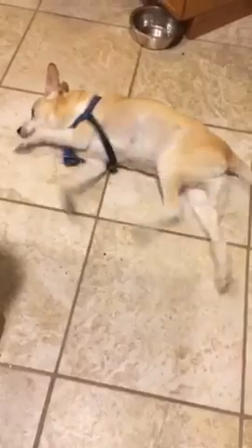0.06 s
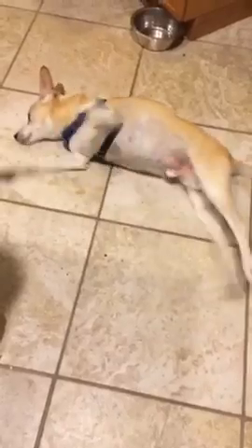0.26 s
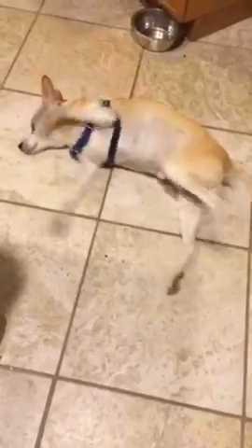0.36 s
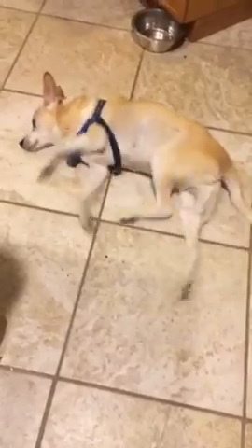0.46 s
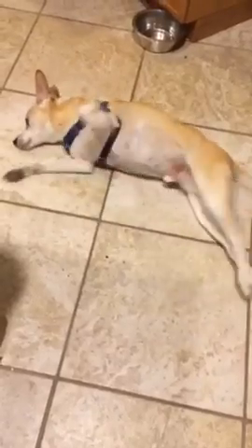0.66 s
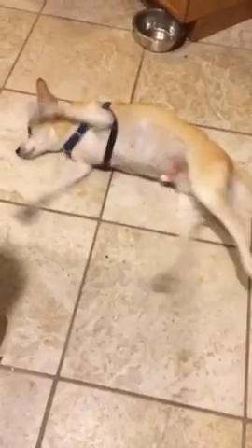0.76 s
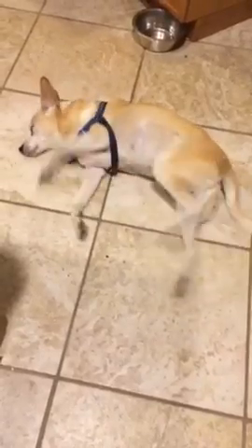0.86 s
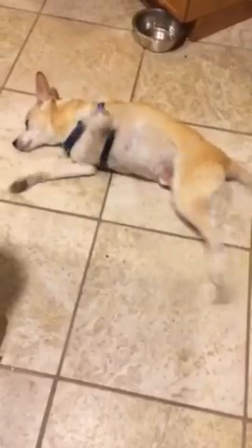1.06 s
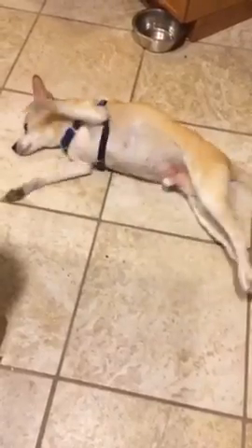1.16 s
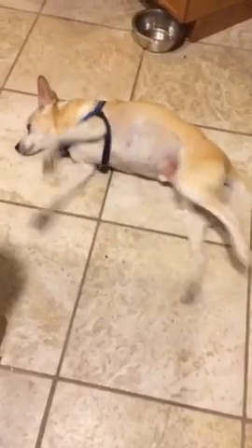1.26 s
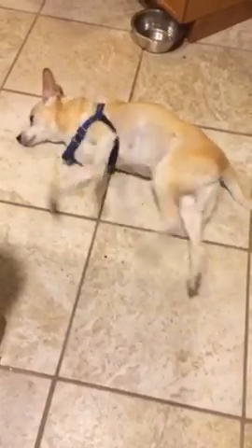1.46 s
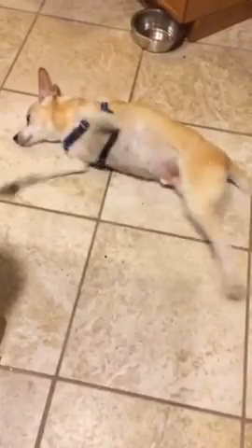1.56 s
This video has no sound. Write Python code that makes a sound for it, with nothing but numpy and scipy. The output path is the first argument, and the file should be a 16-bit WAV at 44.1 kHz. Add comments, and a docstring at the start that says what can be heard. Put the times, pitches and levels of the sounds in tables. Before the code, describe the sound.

A small dog's claws click and skid irregularly on floor tile, broken by a hard double knock

```python
"""A small dog lies on its side on a tiled kitchen floor and paddles its legs.
Claws tick (click plus noise crunch) and slide (dense random slips); the coat rubs (softer slips).
Paws and body thud (short low sines); the flank shifts with a low rumble (filtered slips).
A double knock is much harder, with a thin metallic ring (decaying sines); a faint one follows.
The hard room (decaying noise bands) answers all but the rumble, over quiet background noise."""
import sys
import numpy as np
from scipy import signal
from scipy.fft import rfft, irfft
from scipy.io import wavfile

SR = 44100
rng = np.random.default_rng(int(sys.argv[2]) if len(sys.argv) > 2 else 0)


def inscribe(sig):
    """Save sig as 16-bit PCM at rate SR to the path in sys.argv[1].

    A 1-D sig is mono; a 2-D sig holds one channel per row.
    Samples are clipped to [-1, 1] before scaling.
    """
    pcm = np.round(np.clip(np.atleast_2d(sig).T, -1, 1) * 32767)
    wavfile.write(sys.argv[1], SR, pcm.astype(np.int16))


N = 70560
T = np.arange(N) / SR  # [s]
HZ = np.maximum(np.arange(N + 1) * SR / (2 * N), 1)  # bins of a 2N-point spectrum

# background noise of the house, spectrum: (frequency [Hz], relative density [dB])
AIR_SPECTRUM = [(20, 8.5), (70, 18), (180, 17.5), (255, 13), (320, 11.5), (600, 7.5), (1300, -1),
                (3000, -2.5), (7000, -2.5), (11000, -6.5), (15000, -11)]
AIR_DB = -62

# weight shifts of the body: (time [s], length [s], level [dB])
SHIFTS = [(-.02, 0.04, -60.5), (.44, 0.18, -62), (0.93, 0.14, -57), (1.43, 0.044, -57.5)]
# rumble spectrum: (frequency [Hz], relative level [dB])
SHIFT_SPECTRUM = [(40, -14), (130, -22), (205, 12), (250, -11.5), (310, 4.5), (400, -0.5), (600, -16.5),
                  (2000, -54)]
SHIFT_ATTACK_S, SHIFT_RELEASE_S = 0.04, 0.064

# claws sliding over the tile: (time [s], length [s], level [dB], tilt [dB/octave])
SLIDES = [(-.01, 0.026, -55.5, 0.5), (0.105, 0.022, -46, -1.5), (0.172, 0.034, -46.5, -1.5),
          (0.541, 0.044, -47, -0.5), (0.597, 0.028, -55, -2), (0.621, 0.023, -46.5, 1),
          (0.796, 0.068, -63.5, -2), (0.839, 0.04, -64, -2.5), (.905, 0.017, -63.5, -2.5),
          (1.014, 0.021, -48.5, -1.5), (1.078, 0.053, -53, 1.5), (1.284, 0.036, -71.5, 0),
          (1.444, 0.012, -62, -4), (1.461, .033, -48.5, -0.5), (1.549, 0.035, -51.5, 0)]
# slide spectrum before tilt: (frequency [Hz], relative level [dB])
SLIDE_SPECTRUM = [(300, -10), (900, -1.5), (2000, -5), (4300, 0.5), (7500, 4), (9500, 1), (12200, 5),
                  (14000, -2), (15300, -6)]
SLIDE_ATTACK_S, SLIDE_RELEASE_S = 0.0045, 0.0074
GRAINS_PER_S, GRAIN_SPREAD_DB = 11000, 2
GRIP_STEPS_PER_S, GRIP_DB = 120, 3

# coat and pads rubbing over the floor: (time [s], length [s], level [dB])
RUBS = [(-.01, 0.054, -60), (0.07, 0.039, -52.5), (0.355, 0.08, -60.5), (0.44, 0.042, -55),
        (0.494, 0.1, -58.5), (0.642, 0.032, -58), (0.953, 0.11, -66), (1.075, 0.067, -61),
        (1.19, 0.058, -71), (1.449, 0.08, -62.5)]
# rub spectrum: (frequency [Hz], relative level [dB])
RUB_SPECTRUM = [(100, -1.5), (300, 6.5), (600, -3), (1500, 0.5), (3000, 3.5), (5000, -3), (9000, -7),
                (15000, -13)]
RUB_ATTACK_S, RUB_RELEASE_S = 0.02, 0.0082

# claw ticks: (time [s], energy [dB], crunch decay [s], tilt [dB/octave])
TICKS = [(0.0202, -24, 0.0041, -1.5), (0.0225, -26.5, 0.0038, -6), (0.053, -20.5, 0.0041, -5.5),
         (0.1126, -16, 0.0012, 11), (0.163, -10.5, 0.0057, -1), (0.1789, -6.5, 0.0018, -1),
         (0.1863, -22, 0.0016, -4), (0.4406, -26, 0.0043, -2.5), (.4830, -27.5, 0.0014, -5),
         (.5378, -17, 0.00053, 14), (.5502, -16.5, 0.0025, 6.5), (0.564, -36, 0.0039, 5),
         (0.6026, -20, 0.0048, -4), (0.6755, -25, 0.0022, 8.5), (.7260, -33.5, 0.0018, -8),
         (0.865, -33, 0.0024, -5), (1.018, -19, 0.0017, 5.5), (1.0450, -24, .003, -0.5),
         (1.4657, -16.5, .0015, 10), (1.4672, -20.5, 0.0016, -3.5), (1.506, -22.5, 0.0026, 3.5),
         (1.523, -29, 0.003, 2), (1.554, -30, 0.0022, -9)]
# tick spectrum before tilt: (frequency [Hz], relative level [dB])
TICK_SPECTRUM = [(200, -12.5), (700, -19.5), (1800, -15.5), (4000, -1.5), (6500, -1.5), (9500, -2.5),
                 (12500, -5), (15000, -15.5)]
TICK_CRUNCH_DB = 14.5  # crunch energy relative to the click

# soft blows of paws and body: (time [s], energy before low cut [dB], pitch [Hz])
THUDS = [(0.164, -25, 93), (.228, -11, 216), (.237, -10, 143), (.272, -24.5, 117), (.552, -32.5, 84.4),
         (.640, -19.5, 224), (0.649, -20, 189), (0.665, -18.5, 163), (.755, -34, 118), (0.957, -33.5, 85),
         (1.470, -23.5, 120.4), (1.480, -29.5, 85)]
THUD_T60_CYCLES, THUD_LOW_CUT_HZ = 2.53, 56.5

# hard knocks on the tile: (time [s], gain of crack and ring [dB], extra ring gain [dB])
KNOCKS = [(0.2234, -7, 4), (0.2415, 4, 0), (1.2099, -24.5, -6)]
# crack spectrum: (frequency [Hz], relative level [dB])
KNOCK_SPECTRUM = [(150, -18.5), (500, -12.5), (1000, -8.5), (2300, -6), (3100, -5), (4050, -3),
                  (4800, -6.5), (5700, -3), (7400, -7.5), (8800, -11.5), (10500, -14), (12000, -20.5),
                  (13400, -26), (15000, -45)]
KNOCK_RATTLE_S, KNOCK_RATTLE_DB = 0.0027, -4  # decay; energy relative to the click
# floor modes set ringing by a knock: (frequency [Hz], level [dB], t60 [s])
FLOOR_RING = [(321, -39.5, 0.066), (956, -36.5, 0.05), (1680, -64, .15), (2072, -40.5, 0.081)]
# thin metallic ring above them: (frequency [Hz], relative level [dB], t60 [s])
METAL_RING = [(12950, 0, .028), (13690, 2, .04), (13740, -15, .16), (15150, -20, .08)]
METAL_RING_DB = -31

# diffuse answer of the room: (frequency [Hz], level [dB], t60 [s])
ROOM = [(101, -6.5, 0.32), (180, -5.5, 0.3), (260, -5.5, 0.17), (410, -3, 0.11), (1290, -3.5, 0.29),
        (2590, -3, 0.26), (4800, -6.5, .3), (8900, -5.5, 0.29), (14800, -9.5, .2)]
ROOM_DELAY_S, ROOM_BUILD_S = 0.0049, 0.0017
# low resonances of the room: (frequency [Hz], level [dB], t60 [s])
ROOM_MODES = [(138.5, -64, 0.34), (162, -54.5, 0.57), (209.4, -41.5, 0.14), (333, -43.5, 0.15)]
THUD_TO_ROOM_DB, THUD_TO_MODES_DB = 4.5, -5

CUTOFF_HZ = 15400


def from_db(db):
    """Decibels to amplitude gain."""
    return 10 ** (np.asarray(db) / 20)


def unit(x):
    """Scale to an energy of one."""
    return x / np.sqrt(np.sum(x ** 2) + 1e-20)


def at_hz(points, hz, axis=1):
    """Interpolate a table column on a log-frequency axis."""
    points = np.array(points)
    return np.interp(np.log(hz), np.log(points[:, 0]), points[:, axis])


def convolve(x, response):
    """Pass a sound through an impulse response."""
    return signal.fftconvolve(x, response)[:N]


def colour(x, points, tilt_db=0):
    """Minimum-phase filter of unit energy with the given spectrum, tilted above 1 kHz."""
    octaves = np.log2(np.maximum(HZ, 1000))  # constant offset cancels in unit()
    gain = from_db(at_hz(points, HZ) + tilt_db * octaves)
    cepstrum = irfft(np.log(gain))
    # fold onto positive time: causal, minimum phase
    cepstrum[1:N] *= 2
    cepstrum[N + 1:] = 0
    response = irfft(np.exp(rfft(cepstrum)))[:N]
    return convolve(x, unit(response))


def at_time(x, s):
    """Delay a sound to its start time."""
    return np.concatenate([np.zeros(max(int(s * SR), 0)), x])[:N]


def modes(table):
    """Exponentially decaying sines of a struck body."""
    return sum(from_db(db - 60 * T / t60) * np.sin(2 * np.pi * hz * T) for hz, db, t60 in table)


def stroke(s, length, attack, release):
    """Envelope: linear rise, hold until s + length, exponential release."""
    rise = np.clip((T - s) / attack, 0, 1)
    return rise * np.exp(-np.maximum(T - s - length, 0) / release)


def contact(decay_s, crunch_db):
    """One-sample click plus a dying noise crunch of tiny after-contacts; unit energy."""
    noise = rng.standard_normal(N)
    crunch = noise * np.exp(-T / decay_s) * (1 - np.exp(-T * 10 / decay_s))
    x = from_db(crunch_db) * unit(crunch)
    x[0] += 1
    return unit(x)


def friction():
    """Dense random slips of either sign and uneven size; rms 1."""
    slips = (rng.random(N) < GRAINS_PER_S / SR) * rng.choice([-1, 1], N)
    size_db = GRAIN_SPREAD_DB * np.minimum(rng.exponential(1, N), 5)
    return np.sqrt(N) * unit(slips * from_db(size_db))


def background_air():
    """Steady filtered noise."""
    return from_db(AIR_DB) * colour(rng.standard_normal(N), AIR_SPECTRUM)


def shifts():
    """Flank rolls and drags on the floor: low-coloured friction under a slow weight envelope."""
    weight = sum(from_db(db) * stroke(s, length, SHIFT_ATTACK_S, SHIFT_RELEASE_S)
                 for s, length, db in SHIFTS)
    return colour(friction() * weight, SHIFT_SPECTRUM)


def grip():
    """Claw catches and lets go unevenly: interpolated random gain."""
    steps = rng.standard_normal(N)
    return from_db(GRIP_DB * np.interp(T * GRIP_STEPS_PER_S, np.arange(N), steps))


def slides():
    """Claws skate over the grain of the glaze: friction with uneven grip."""
    out = 0
    for s, length, db, tilt in SLIDES:
        slips = friction() * grip() * stroke(s, length, SLIDE_ATTACK_S, SLIDE_RELEASE_S)
        out = out + from_db(db) * colour(slips, SLIDE_SPECTRUM, tilt)
    return out


def rubs():
    """Fur and pads brush the floor: friction under a pressure envelope."""
    pressure = sum(from_db(db) * stroke(s, length, RUB_ATTACK_S, RUB_RELEASE_S)
                   for s, length, db in RUBS)
    return colour(friction() * pressure, RUB_SPECTRUM)


def ticks():
    """Claw tips land on the tile: click and crunch, each with its own tilt."""
    out = 0
    for s, db, decay_s, tilt in TICKS:
        tick = colour(contact(decay_s, TICK_CRUNCH_DB), TICK_SPECTRUM, tilt)
        out = out + from_db(db) * at_time(tick, s)
    return out


def thuds():
    """Soft blows: low sines that swell and die within a few cycles."""
    blows = 0
    for s, db, hz in THUDS:
        blow = unit(T * modes([(hz, 0, THUD_T60_CYCLES / hz)]))  # factor T: swell
        blows = blows + from_db(db) * at_time(blow, s)
    low_cut = signal.butter(2, THUD_LOW_CUT_HZ, "high", fs=SR, output="sos")
    return signal.sosfilt(low_cut, blows)


def knocks():
    """Hard blows: a dry crack, ringing floor modes and a thin metallic ring."""
    ring = modes(FLOOR_RING) + from_db(METAL_RING_DB) * modes(METAL_RING)
    out = 0
    for s, db, ring_db in KNOCKS:
        crack = colour(contact(KNOCK_RATTLE_S, KNOCK_RATTLE_DB), KNOCK_SPECTRUM)
        out = out + from_db(db) * at_time(crack + from_db(ring_db) * ring, s)
    return out


def room_response():
    """Diffuse echoes: noise bands that build up quickly, each with its own level and t60."""
    out, edges = 0, np.geomspace(45, 18000, 19)
    white = rng.standard_normal((2, N))  # adjacent bands use different noise
    for k, (low, high) in enumerate(zip(edges, edges[1:])):
        hz = np.sqrt(low * high)
        band_pass = signal.butter(2, [low, high], "band", fs=SR, output="sos")
        band = signal.sosfilt(band_pass, white[k % 2])
        decay = np.exp(-np.log(1000) * T / at_hz(ROOM, hz, axis=2))
        envelope = decay * (1 - np.exp(-T / ROOM_BUILD_S))
        out = out + from_db(at_hz(ROOM, hz)) * band * unit(envelope)
    return at_time(out, ROOM_DELAY_S)


def scene():
    """Sum of the dog's sounds, the room's answer and the background, one channel."""
    sharp = knocks() + ticks() + slides() + rubs()
    soft = thuds()
    echoes = convolve(sharp + from_db(THUD_TO_ROOM_DB) * soft, room_response())
    boom = convolve(from_db(THUD_TO_MODES_DB) * soft, modes(ROOM_MODES))
    air = background_air()
    return (sharp + soft + shifts() + echoes + boom + air)[None]


def record(dry):
    """Steep elliptic low-pass."""
    low_pass = signal.ellip(10, 0.1, 70, CUTOFF_HZ, fs=SR, output="sos")
    return signal.sosfilt(low_pass, dry)


dry = scene()
out = record(dry)
inscribe(out)
```